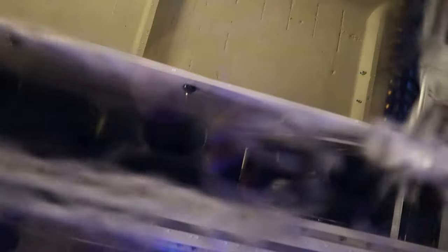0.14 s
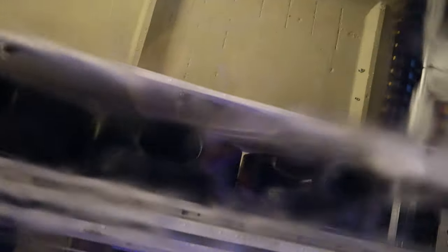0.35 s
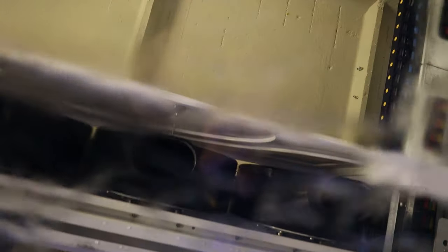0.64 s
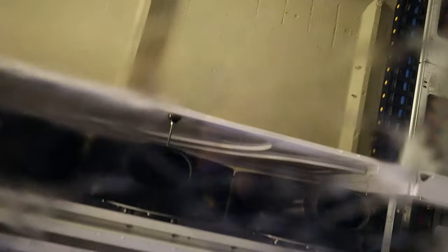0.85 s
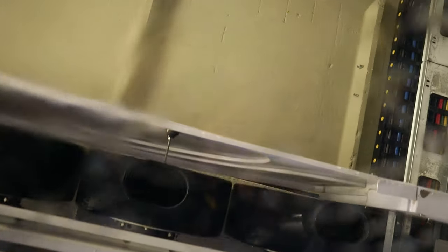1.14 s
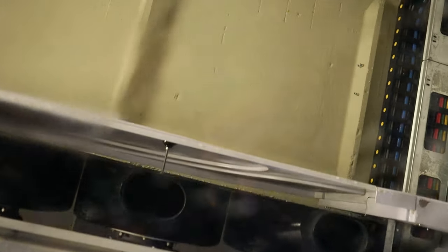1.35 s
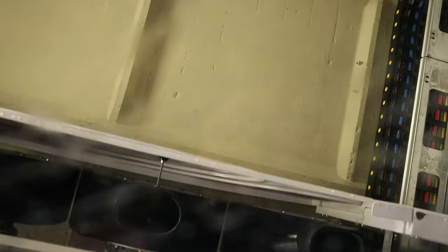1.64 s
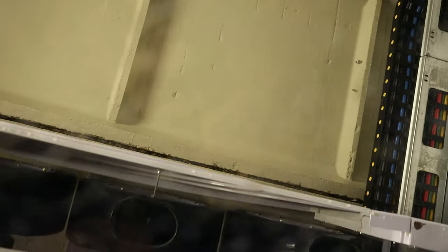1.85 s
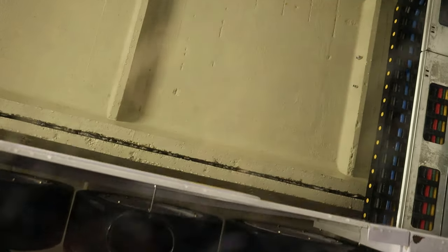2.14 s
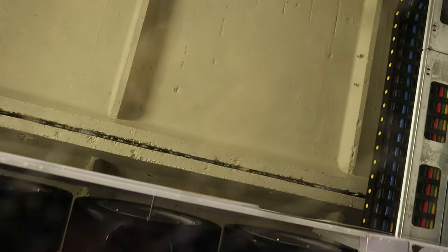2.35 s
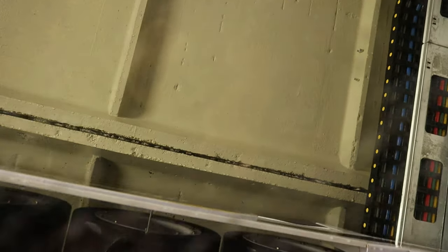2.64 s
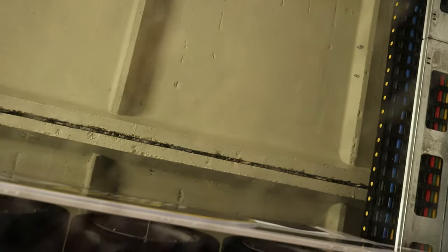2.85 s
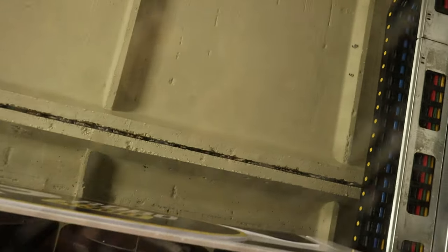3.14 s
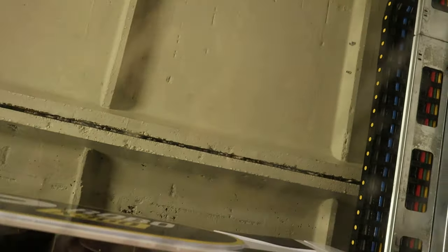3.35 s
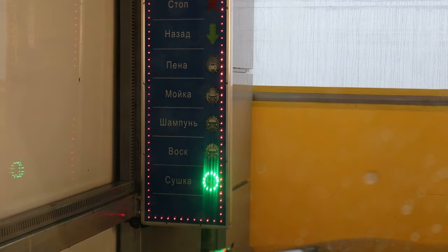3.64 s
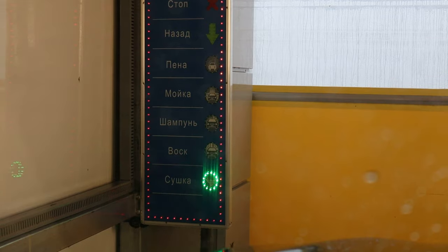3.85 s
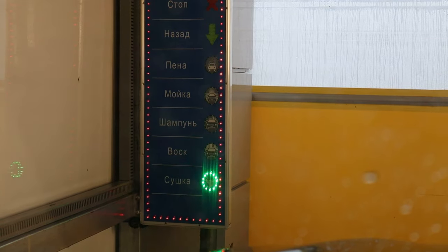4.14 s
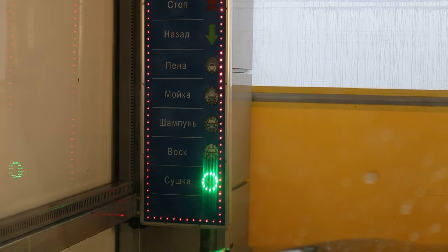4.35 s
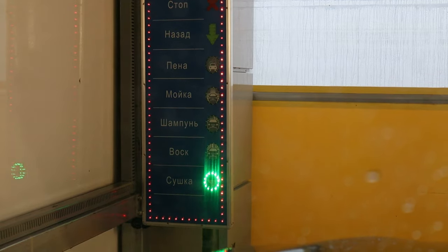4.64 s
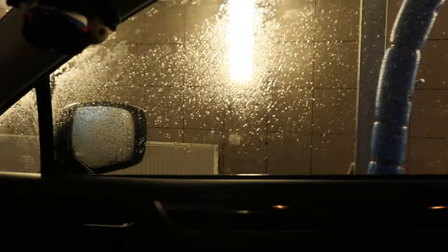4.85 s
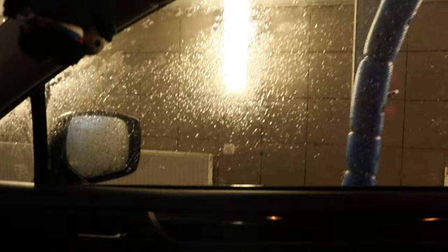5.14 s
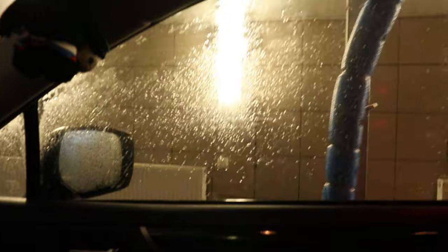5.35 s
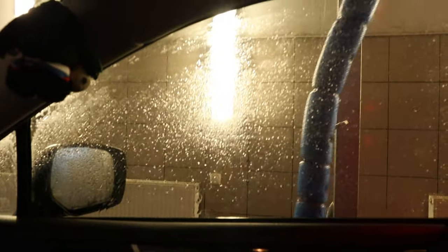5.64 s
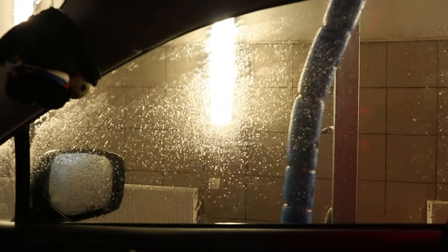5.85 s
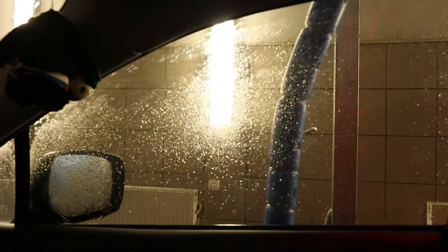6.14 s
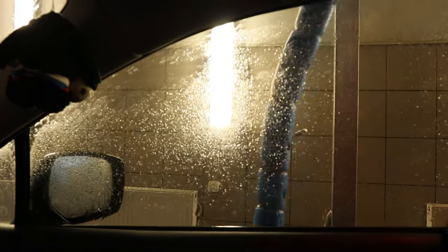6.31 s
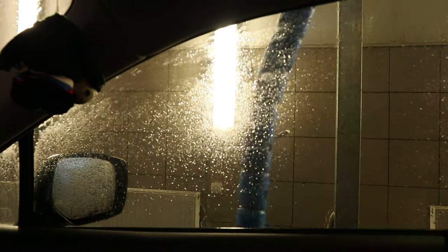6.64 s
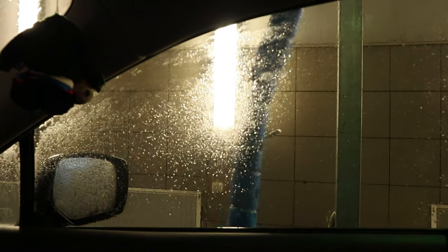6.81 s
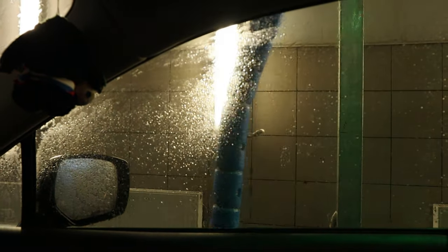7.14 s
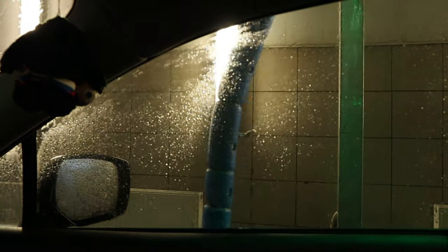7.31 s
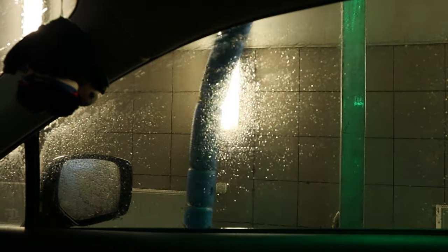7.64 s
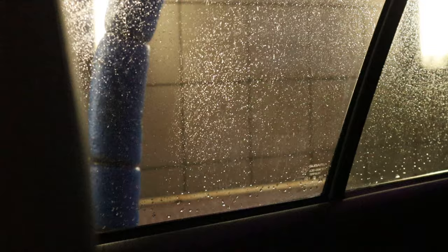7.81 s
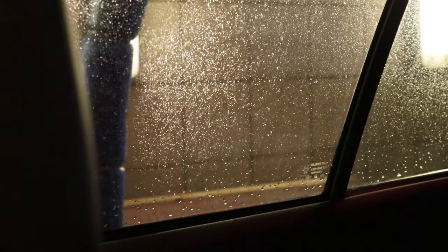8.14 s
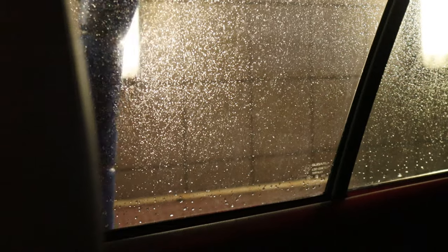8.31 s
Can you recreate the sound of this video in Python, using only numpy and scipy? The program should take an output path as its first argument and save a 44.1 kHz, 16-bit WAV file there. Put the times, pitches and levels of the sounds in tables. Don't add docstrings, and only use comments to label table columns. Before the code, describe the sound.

Deep, steady blower roar heard inside a closed car, with muffled rumbling panels, faint air hiss and whine, briefly cut near the end.

```python
import sys
import numpy as np
from scipy import signal
from scipy.fft import rfft, irfft
from scipy.io import wavfile
from scipy.ndimage import uniform_filter1d

SR = 44100
rng = np.random.default_rng(int(sys.argv[2]) if len(sys.argv) > 2 else 0)


def linear_from_db(decibels):
    return 10 ** (np.asarray(decibels, float) / 20)


def dump_mix(stems):
    frames = np.atleast_2d(stems).T
    limited = np.clip(frames, -1, 1)
    pcm = np.round(limited * 32767).astype(np.int16)
    wavfile.write(sys.argv[1], SR, pcm)


N = 373527

# [f/Hz, level/dB per Hz]
PANELS = [
    [(16, -38), (28, -14.5), (86, 1.5), (144, 0.5), (167, -5.5), (193, -1.5), (271, -11.5), (319, -12.5),
     (404, -26.5), (489, -29), (584, -27), (629, -34), (729, -34), (784, -32.5), (950, -47), (1240, -63.5),
     (2090, -120)],
    [(16, -34.5), (28, -1), (43, 0.5), (81, 1.5), (112, 1), (185, -5), (252, -16), (275, -18), (310, -14),
     (349, -21.5), (461, -23.5), (567, -25.5), (667, -33.5), (761, -29), (950, -43), (1240, -68),
     (2090, -120)],
]
# [f/Hz, level/dB per Hz]
PANELS_MOVED = [
    [(16, -35.5), (28, -12.5), (43, -2.5), (76, -4), (134, -0.5), (153, -3), (172, -8), (205, -7),
     (267, -14), (333, -9.5), (428, -18.5), (461, -15), (542, -22.5), (647, -22), (950, -33), (1240, -54),
     (2090, -120)],
    [(16, -47), (28, -9), (48, -12), (59, -16), (73, -9.5), (102, -9.5), (119, 0.5), (150, -6), (211, -3.5),
     (241, -7), (338, -9.5), (489, -17.5), (687, -22.5), (950, -33), (1240, -70), (2090, -120)],
]
# [t/s, level/dB rise]
FLOOR_GUSTS = [(0.0, 7.5), (.3, 4), (.53, 3.5), (.74, -1), (.96, 3), (1.18, -7), (1.3, 5.5), (1.46, 3.5),
               (1.64, 7), (1.77, -3.5), (2.1, 4), (2.19, 5.5), (2.27, -10), (2.53, 3.5), (2.82, -0.5),
               (2.98, 5.5), (3.14, 1.5), (3.22, 4.5), (3.66, 2), (4.0, 0.5), (5.23, 5.5), (5.32, -0.5),
               (6.59, 7.5), (6.76, 5), (6.85, -6), (7.0, 8.5), (7.39, 2), (7.64, 7), (8.25, 7), (8.44, 4)]
# [t/s, level/dB rise]
ROOF_GUSTS = [(.04, -1), (.41, 3), (.49, 2), (.68, 1.5), (.87, 3), (1.24, 6), (1.41, 0.5), (1.63, 2.5),
              (1.77, 2.5), (2.14, -3), (2.28, 1.5), (2.62, 1.5), (2.89, 1), (3.06, 2), (3.2, 3),
              (3.59, 3.5), (3.73, 4.5), (3.96, 7.5), (4.24, 0), (5.23, 3), (5.32, 6), (6.56, 1), (6.71, 2),
              (6.85, 0.5), (7.15, -1.5), (7.38, 4.5), (7.64, 3.5), (7.85, 6.5), (8.25, 3.5), (8.44, 4)]
# [t/s, level/dB rise]
DOOR_GUSTS = [(0, 3.5), (.48, 1.5), (.68, 3.5), (.96, 2), (1.24, 1.5), (1.42, 2.5), (1.74, 1), (2.3, 0),
              (2.6, -2), (2.78, 2.5), (2.98, 2), (3.59, 1), (4.0, 4), (4.11, 0.5), (4.25, 0), (4.5, 2.5),
              (4.62, 3), (5.32, 1), (6.17, -5.5), (6.3, 1.5), (6.59, 2.5), (6.71, 0.5), (6.87, -1),
              (7.0, 1), (7.31, 1.5), (7.39, 1.5), (7.5, -5), (7.75, -1), (8.06, 1), (8.3, -1.5)]


def panels(floor_db, roof_db, doors_db):
    shaken = from_seats(turbulence(patchy_db=0.27, flicker_db=0.37), PANELS + PANELS_MOVED)
    floor = below(shaken, 130)
    floor_and_roof = below(shaken, 290)
    roof = floor_and_roof - floor
    doors = shaken - floor_and_roof
    return (buffeted(floor, floor_db, FLOOR_GUSTS)
            + buffeted(roof, roof_db, ROOF_GUSTS)
            + buffeted(doors, doors_db, DOOR_GUSTS))


def buffeted(panel, level_db, gusts):
    return linear_from_db(level_db + bumps(gusts, half_s=0.027)) * steadied(panel, 0.14)


# [f/Hz, level/dB per Hz]
LEAK = [
    [(500, -23), (850, -0.5), (1050, -3), (1170, -3.5), (1570, -5.5), (1730, -4.5), (2140, -8.5),
     (3680, -6), (4330, -11), (5460, -13.5), (7290, -18), (8500, -27), (11000, -57), (18700, -120)],
    [(500, -31), (850, -5), (1060, 2), (1190, -1.5), (1590, -4), (1680, -4.5), (1870, -6), (2000, -6),
     (2160, -8), (3540, -8.5), (7290, -20), (8500, -28.5), (11000, -54), (18700, -120)],
    [(500, -22.5), (850, -2.5), (982, -4), (1310, -4.5), (1440, -7), (1870, -9.5), (2020, -8), (2120, -10),
     (2520, -14.5), (4860, -17.5), (5460, -22), (7360, -25), (8500, -33.5), (11000, -60), (18700, -120)],
    [(500, -31), (850, -4), (1470, -6.5), (1820, -13), (1910, -8), (2060, -11), (3150, -14.5),
     (4330, -13.5), (4770, -20), (6370, -23.5), (8500, -35), (11000, -70), (18700, -120)],
]
# [t/s, level/dB rise]
NOZZLES = [
    (.1, -0.051),
    (1.0, -0.24),
    (1.8, 1.6),
    (4.15, .6),
    (4.6, 0.36),
    (5.6, 0.14),
    (7.4, 0.73),
]


def air_leak(rush_db, hiss_db):
    air = from_seats(turbulence(patchy_db=0.38, flicker_db=0.28), LEAK)
    rush = below(air, 2400)
    hiss = air - rush
    rush_gain = linear_from_db(rush_db + bumps(NOZZLES, half_s=.3))
    hiss_gain = linear_from_db(hiss_db - 0.14 + .4 * flings_db())
    return rush_gain * steadied(rush, 0.23) + hiss_gain * steadied(hiss, .12)


# [f/Hz, level/dB per Hz]
SPRAY = [
    [(7600, -16.5), (8800, -3), (9600, 1), (12000, -2.5), (14000, -11.5), (15600, -23.5)],
    [(7600, -19), (8800, 0.5), (9600, 0), (12000, -5), (13600, -14), (15600, -27.5)],
    [(7600, -29), (8800, -1), (9300, -5), (9450, 3), (9600, 0), (12000, -12), (14000, -17), (15600, -27)],
]


def spray_fizz(fizz_db):
    fizz = from_seats(turbulence(patchy_db=1.6, flicker_db=.7), SPRAY[:1] + SPRAY)
    return linear_from_db(fizz_db - 1.0 + flings_db()) * steadied(fizz, .3)


# [t/s, level/dB rise]
SPURTS = [(.03, 1.5), (.9, 0), (1.125, 5), (1.75, 0), (2.9, 1.5), (3.38, 1), (3.86, 4), (3.97, 4), (4.2, 1),
          (4.42, 1.5), (4.6, -1), (4.84, 1.5), (5.6, 1.5), (6.4, -2), (7.225, 0), (7.82, 4), (8.203, 2)]


def flings_db():
    return bumps(SPURTS, half_s=.018)


# [f/Hz, width/Hz, level/dB]
UPPER = [
    (1966, 9, -0.3),
    (3910, 38, -16.5),
    (1995, 70, -8),
]
# [f/Hz, width/Hz, level/dB]
LOWER = [
    (1676, 6, -8),
    (1725, 50, -2.5),
]
# [upper blower level/dB, lower blower level/dB]
WHINE_DB = [
    (-65, -61),
    (-62.5, -60.5),
    (-61.5, -63),
    (-64.5, -68),
]
# [t/s, level/dB rise]
UPPER_SWELLS = [(0, 6), (.57, 2.5), (.68, 3), (1.08, 3), (1.2, 8), (1.6, 8), (1.9, 5), (2.02, 7), (2.3, 11),
                (2.54, 2.5), (3.21, 10), (3.29, 7), (3.82, 14.5), (3.98, 6), (4.11, 2.5), (4.5, 7),
                (4.62, 9), (4.75, 8), (4.87, 5), (4.96, 7), (5.16, 6), (6.05, 3), (6.3, 5), (6.5, 5),
                (6.78, 2.5), (7.18, 1), (7.43, 4), (7.68, 1), (7.79, 5), (8.24, 6)]
# [t/s, level/dB rise]
LOWER_SWELLS = [(0, 11), (.13, 6), (.44, 6), (.61, 5), (1.09, 9.5), (1.54, 8), (1.66, 6), (1.9, 12),
                (2.01, 5), (2.3, 6), (2.57, 6), (3.1, 5), (3.21, 2), (3.32, 4), (3.5, 7), (3.95, 1),
                (4.11, 10), (4.5, 4), (5.23, 5), (6.06, 4), (6.3, 5), (6.5, 5), (7.35, 8), (7.79, 7)]


def blower_whines():
    upper_db, lower_db = np.transpose(WHINE_DB) @ seats()
    upper = blades(UPPER, upper_db + bumps(UPPER_SWELLS, half_s=.045))
    lower = blades(LOWER, lower_db + bumps(LOWER_SWELLS, half_s=.045))
    return upper + lower


def blades(tones, level_db):
    t = np.arange(N) / SR
    slow_t = t[::64]
    out = np.zeros(N)
    for hz, width_hz, db in tones:
        pole = np.exp(-64 * np.pi * width_hz / SR)
        noise = rng.standard_normal((len(slow_t), 2))
        wander = signal.lfilter([1], np.convolve([1, -pole], [1, -pole]), noise, axis=0)
        along, across = (np.interp(t, slow_t, w) for w in wander.T)
        phase = 2 * np.pi * hz * t
        tone = along * np.cos(phase) + across * np.sin(phase)
        out += linear_from_db(db) * steadied(tone, .04)
    return linear_from_db(level_db) * out


# [floor level/dB, roof level/dB, doors level/dB]
BODY_DB = [
    (-24.5, -25.5, -35),
    (-25.5, -27, -36.5),
    (-28, -29, -35.5),
    (-27.5, -27, -32),
]
# [rush level/dB, fizz level/dB, hiss level/dB]
GLASS_DB = [
    (-47, -75.5, -50.5),
    (-47.5, -76, -49.5),
    (-48, -77, -51.5),
    (-49, -84, -52),
]
# [t/s, level/dB change]
PRESSURE = [(0, 3.5), (.25, 0.5), (.6, 0), (1.1, -0.5), (1.6, 0.5), (2.0, -0.5), (2.5, .5), (3.0, -0.5),
            (3.5, -.5), (3.95, -0.5), (4.3, 1.5), (5.0, -.5), (5.6, 1), (6.2, 0.5), (6.8, 0), (7.3, -0.5),
            (7.85, 1), (8.47, 0.5)]
FOLLOW = (1., 1, 0.28, .3, .2, .15)
# [floor, roof, doors, rush, fizz, hiss level/dB]
DIP_DB = (-6, -7, -4, -4, -5, -2.5)


def layers_db():
    seat_db = np.hstack([BODY_DB, GLASS_DB]).T @ seats()
    pressure_db = np.interp(np.arange(N) / SR, *np.transpose(PRESSURE))
    lull = bumps([(4.055, 1)], half_s=0.025)
    return seat_db + np.outer(FOLLOW, pressure_db) + np.outer(DIP_DB, lull)


# [start t/s, end t/s]
CHANGE = (4.0, 4.09)
# [stop t/s, return t/s, full t/s]
SPLICE = (7.86216, 7.8805, 7.896)


def seats():
    t = np.arange(N) / SR
    rolled = np.clip((t - .6) / 3.3, 0, 1)
    second = np.clip((t - CHANGE[0]) / (CHANGE[1] - CHANGE[0]), 0, 1)
    third = t > SPLICE[0]
    return np.array([(1 - second) * (1 - rolled), (1 - second) * rolled, second * ~third, third])


def from_seats(x, spectra):
    log_hz = np.log(np.fft.rfftfreq(N, 1 / SR) + 1)
    z, out = rfft(x), np.zeros(N)
    for share, points in zip(seats(), spectra):
        f, db = np.transpose(points)
        colour = linear_from_db(np.interp(log_hz, np.log(f), db))
        out += share * evened(irfft(z * colour, N))
    return out


def turbulence(patchy_db, flicker_db):
    frames = N // 128 + 9
    a, b, patches = rng.standard_normal((frames, 257, 3)).T
    patches = uniform_filter1d(patches, size=8, axis=0)
    patches = evened(uniform_filter1d(patches, size=16, axis=1))
    flicker = evened(uniform_filter1d(rng.standard_normal(frames), size=12))
    z = (a + 1j * b) * linear_from_db(patchy_db * patches + flicker_db * flicker)
    return signal.istft(z, nperseg=512, noverlap=384)[1][512:N + 512]


def bumps(events, half_s):
    t = np.arange(0, N, 64) / SR
    rise_db = sum(db * np.exp(-((t - s) / half_s) ** 2) for s, db in events)
    return np.interp(np.arange(N) / SR, t, rise_db)


def below(x, edge_hz):
    return irfft(rfft(x) / (1 + (np.fft.rfftfreq(N, 1 / SR) / edge_hz) ** 10), N)


def evened(x):
    return x / np.sqrt(np.mean(x ** 2) + 1e-20)


def steadied(x, seconds):
    size = int(seconds * SR)
    power = uniform_filter1d(uniform_filter1d(x ** 2, size), size)
    return x / np.sqrt(power + 1e-20)


def scene():
    floor_db, roof_db, doors_db, rush_db, fizz_db, hiss_db = layers_db()
    body = panels(floor_db, roof_db, doors_db)
    glass = air_leak(rush_db, hiss_db) + spray_fizz(fizz_db)
    return (body + glass + blower_whines())[None]


def top_cut(x):
    return signal.sosfilt(signal.butter(12, 15900, fs=SR, output="sos"), x)


# [t/s, height]
ENDS = [
    (0, .15),
    (7.86216, .093),
    (8.47, -.1),
]


def record(dry):
    t = np.arange(N) / SR
    cut, back, full = SPLICE
    bass_loss = np.sqrt(1 + (37 / (np.fft.rfftfreq(N, 1 / SR) + 1)) ** 10)
    heard = irfft(rfft(dry) / bass_loss, N)
    for s, height in ENDS:
        near = np.cos(np.clip(abs(t - s) / .005, 0, 1) * np.pi / 2) ** 2
        heard = heard + near * (height - heard[:, min(int(s * SR), N - 1), None])
    fade = np.sin(np.clip((t - back) / (full - back), 0, 1) * np.pi / 2) ** 2
    mix = heard * np.where(t < cut, 1, fade)
    return top_cut(mix)


dry = scene()
out = record(dry)
dump_mix(out)
```